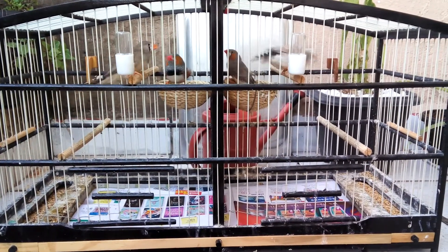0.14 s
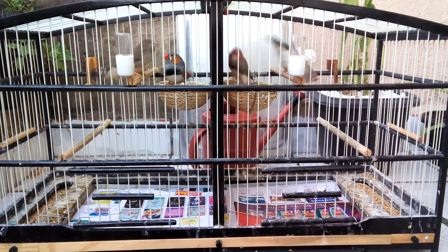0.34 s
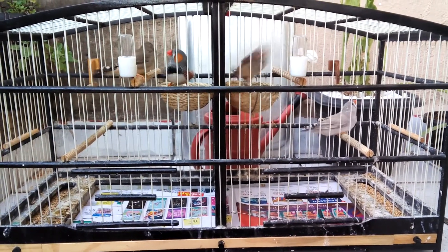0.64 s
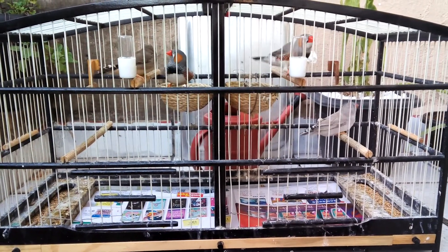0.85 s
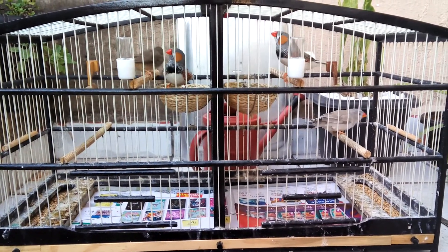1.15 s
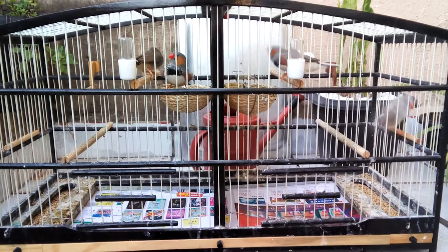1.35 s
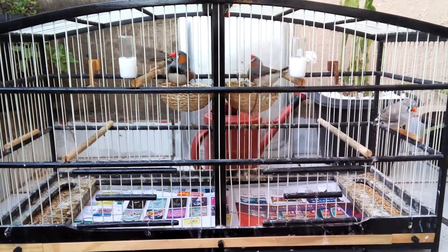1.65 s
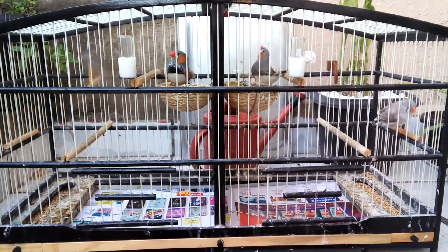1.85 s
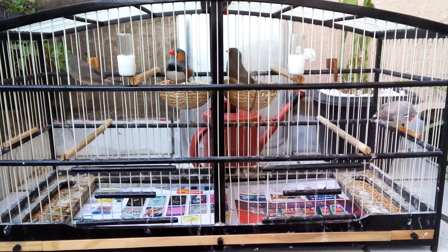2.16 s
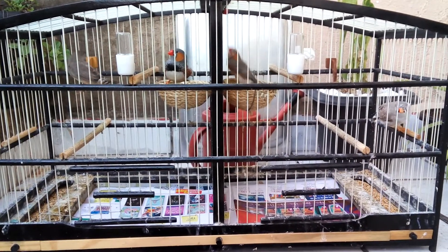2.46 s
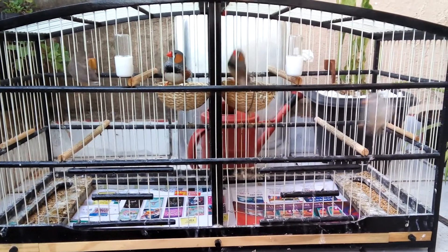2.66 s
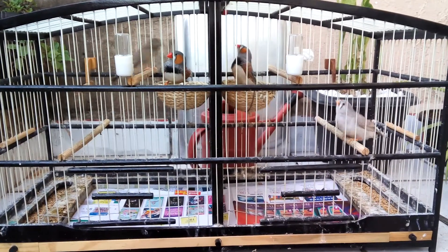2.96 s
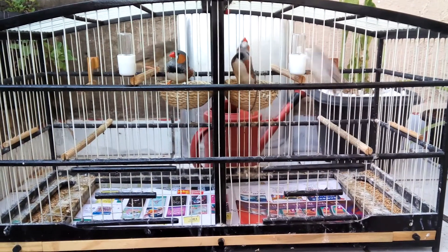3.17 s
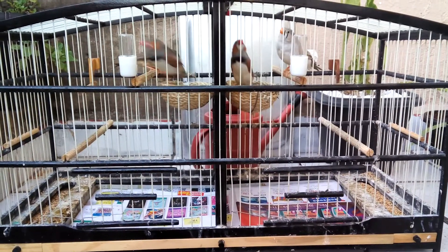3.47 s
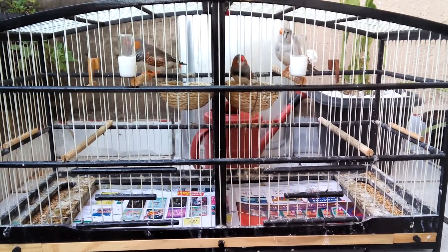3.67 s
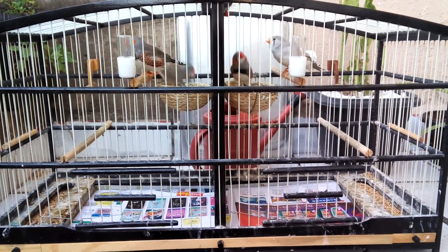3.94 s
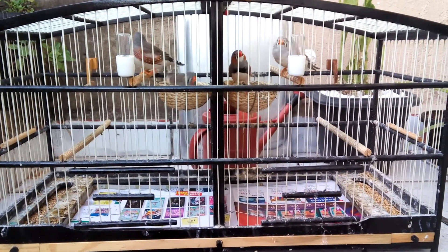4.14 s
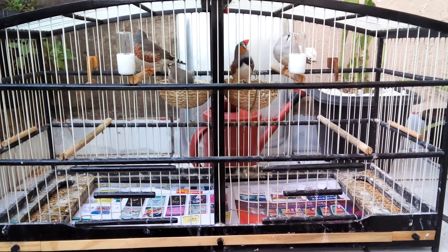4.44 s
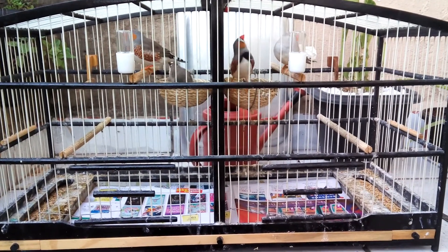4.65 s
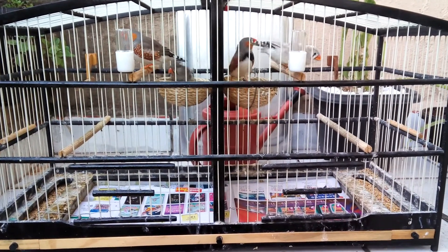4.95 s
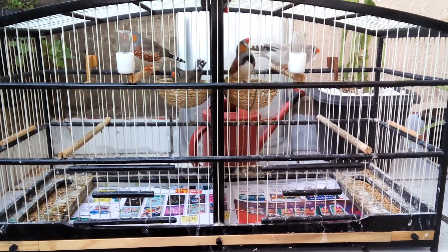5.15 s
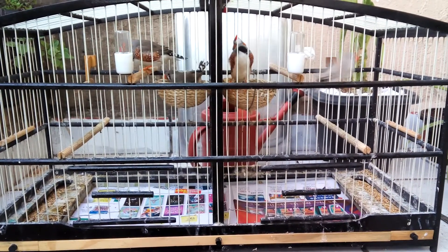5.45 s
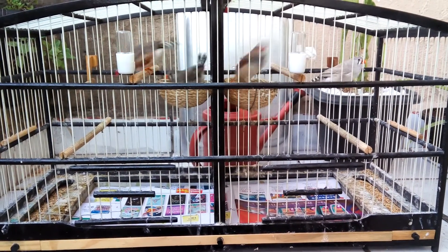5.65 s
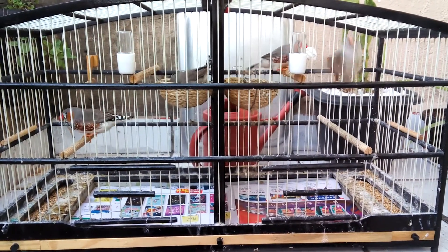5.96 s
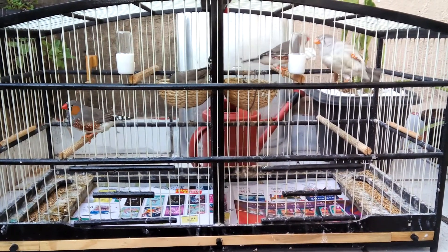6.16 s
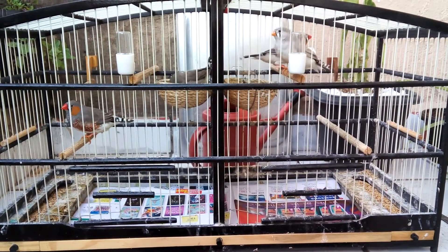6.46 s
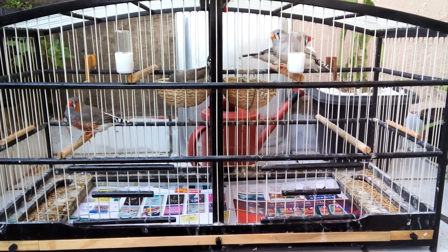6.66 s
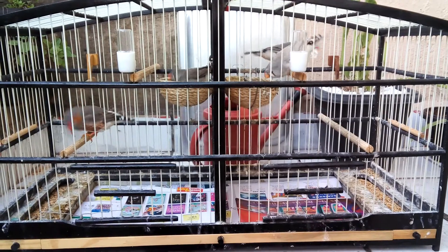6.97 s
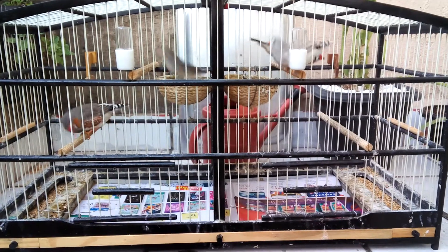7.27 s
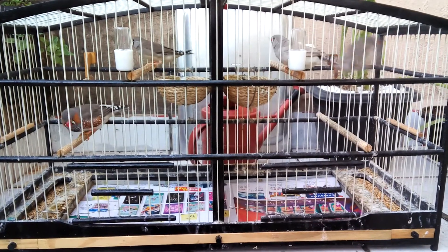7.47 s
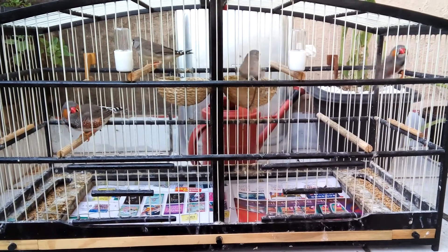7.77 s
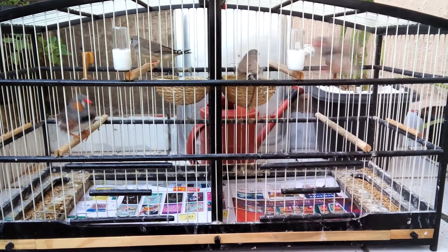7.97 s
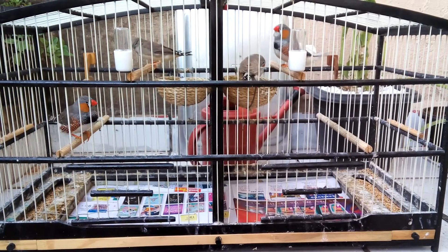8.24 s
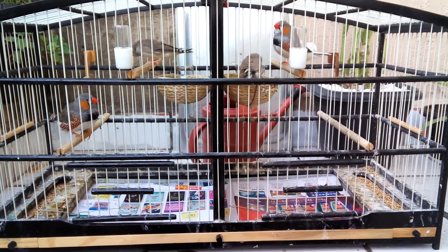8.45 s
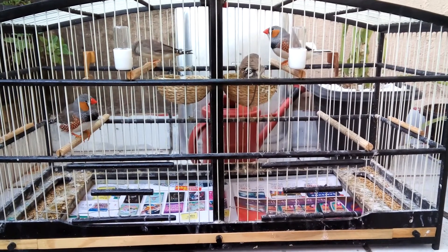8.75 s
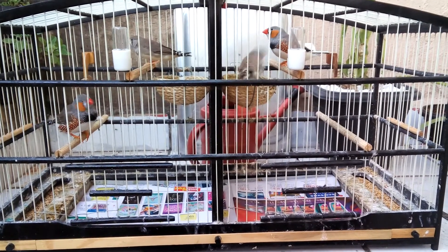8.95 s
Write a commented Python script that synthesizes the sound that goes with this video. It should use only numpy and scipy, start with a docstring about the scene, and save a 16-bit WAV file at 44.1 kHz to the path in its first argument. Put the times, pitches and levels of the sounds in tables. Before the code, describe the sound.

Zebra finches call from perches and nests: short, reedy, harmonic beeps, some soft, some loud. Claws tick lightly on wood and wire, and distant birds whistle and chirp thinly. Around the middle a dense run of nasal and scratchy notes forms a song, loudest near five seconds. Later calls are sparse, then quick soft wing beats. Quiet airy place, short reflections, softened treble.

```python
"""From the first moment caged finches trade short nasal calls in an airy room, over a low rumble and faint hiss.
Claws tick on perches and wire, and thin whistles, chirps and soft low tones come from far off as time goes on.
Rasping song notes stand out between about 3.7 and 6.2 s; near 8 s one bird flutters up.
Calls are stacks of overtones lifted by resonances, rasps are pulse trains through a resonance, and
whistles, ticks, wing beats and air are shaped noise; low tones waver, and walls add a short tail."""
import sys
import numpy as np
from scipy import signal
from scipy.fft import rfft, irfft
from scipy.io import wavfile
from scipy.ndimage import uniform_filter1d

SR = 44100
rng = np.random.default_rng(int(sys.argv[2]) if len(sys.argv) > 2 else 0)


def master_out(mix):
    """Clip the mix to full scale and print it as 16-bit PCM to the path in sys.argv[1]."""
    frames = np.transpose(np.atleast_2d(mix))
    ceiling = np.clip(frames, -1, 1)
    pcm = np.round(ceiling * 32767).astype(np.int16)
    wavfile.write(sys.argv[1], SR, pcm)


N = 401737  # samples


def gain_of(db):
    """Decibel law: 20 dB is a factor of ten in amplitude."""
    return 10 ** (np.asarray(db) / 20)


def evened(x):
    """Normalisation to a root-mean-square value of one."""
    return x / np.sqrt(np.mean(x ** 2) + 1e-20)


def read(points, hz):
    """Interpolation of a curve along a logarithmic frequency axis."""
    f, value = np.transpose(points)
    return np.interp(np.log(hz + 1), np.log(f + 1), value)


def add(mix, s, sound):
    """Superposition: a sound starting at s seconds sums into the mix."""
    part = mix[max(round(s * SR), 0):][:len(sound)]
    part += sound[:len(part)]


def wobble(count, hz):
    """Random modulation: noise smoothed twice, so that it changes about hz times a second."""
    span = max(round(SR / hz), 2)
    once = uniform_filter1d(rng.standard_normal(count), span)
    return evened(uniform_filter1d(once, span))


def coloured(count, points):
    """Spectral shaping: white noise weighted by a curve of dB against Hz."""
    hz = np.fft.rfftfreq(count, 1 / SR)
    spectrum = rfft(rng.standard_normal(count)) * gain_of(read(points, hz))
    return evened(irfft(spectrum, count))


def resonate(x, hz, width):
    """Resonance by heterodyne: shift hz down to zero, smooth, and shift back, with a gain of one."""
    turn = np.exp(2j * np.pi * np.cumsum(hz * np.ones(len(x))) / SR)
    r = np.exp(-np.pi * width / SR)
    smooth = signal.lfilter([1 - r], [1, -r], x / turn + 1e-18)  # the tiny offset avoids exact zeros
    return 2 * (turn * smooth).real


def follow(rows, rise, fall):
    """Envelope and glide: a contour read at every sample, with a soft fade at both ends."""
    s, *columns = np.transpose(rows)
    t = np.arange(max(s[0] - rise / 2, 0), s[-1] + fall, 1 / SR)
    fade_in = np.clip((t - s[0]) / rise + .5, 0, 1)
    fade_out = np.clip((s[-1] + fall - t) / fall, 0, 1)
    fade = np.sin(np.pi / 2 * fade_in * fade_out) ** 2
    return t[0], fade, [np.interp(t, s, c) for c in columns]


# Spectrum of the air and outdoor rumble. Each row: frequency in Hz, relative density in dB per Hz.
AIR_SPECTRUM = [(25, -43), (42, -22), (58, -5.5), (108, -0.5), (250, -12.5), (330, -7), (500, -15.5),
                (800, -19.5), (1500, -25), (3400, -28.5), (5500, -25.5), (7000, -26), (9000, -38.5)]
AIR_DB = -62.5  # level of the whole bed


def air():
    """Diffuse noise: random short-time spectra with drifting patches of far chatter and rumble."""
    frames, hz = N // 256 + 5, np.fft.rfftfreq(1024, 1 / SR)
    a, b, patches = rng.standard_normal((frames, 513, 3)).T
    # smoothing over 14 frequency bins and 20 frames makes the patches
    patches = evened(uniform_filter1d(uniform_filter1d(patches, 14, 0), 20, 1))
    patchy_db = read([(100, 0.4), (600, 3.4), (3000, 1.6), (6000, 2.8), (9000, .4)], hz)[:, None]
    level_db = read(AIR_SPECTRUM, hz)[:, None] + patchy_db * patches
    spectra = (a + 1j * b) * gain_of(level_db)
    return gain_of(AIR_DB) * evened(signal.istft(spectra, nperseg=1024, noverlap=768)[1][:N])


# Decay of the room. Each row: frequency in Hz, time to die by 60 dB in seconds.
ROOM_DECAY = [(500, 0.25), (3500, 0.15), (7000, 0.18), (10000, 0.044)]


def room(x):
    """Reverberation: sparse echoes of random sign, each band dying at its own speed."""
    taps = np.zeros(SR // 2)
    at = np.arange(60, len(taps) - 20, 20)
    taps[at + rng.integers(0, 20, len(at))] = rng.choice([-1., 1.], len(at))
    hz, t, spectra = signal.stft(taps, SR, nperseg=256)
    decay = gain_of(-60 * t / read(ROOM_DECAY, hz)[:, None])
    tail = signal.istft(spectra * decay, SR, nperseg=256)[1]
    return signal.fftconvolve(x, tail / np.linalg.norm(tail))[:N]


# Short low tones from far off: hoots, and near 4.6-4.8 s a faint finch call.
# Each row: start in seconds, length in seconds, level in dB, mean pitch in Hz.
LOW_TONES = [(3.952, 0.1, -63.5, 370), (4.31, 0.03, -60, 480), (4.41, .065, -62, 330), (4.47, .2, -56, 497),
             (4.575, .05, -62, 610), (4.655, .08, -63, 335), (4.71, .11, -64, 605),
             (5.572, 0.098, -62, 757), (7.877, 0.085, -60.5, 346)]


def low_tone(s, length, db, hz):
    """Frequency modulation: a soft low tone that wavers slightly in pitch and level."""
    count = round(length * SR)
    pitch_hz = hz * (1 + 0.026 * wobble(count, hz=60.))
    tone = np.sin(2 * np.pi * np.cumsum(pitch_hz) / SR)
    level_db = db + 2.9 * wobble(count, hz=30.14)
    return s, gain_of(level_db) * tone * signal.windows.tukey(count, .5)


# Thin whistles of far birds, and at 7.18 s the faint ring of a ticked wire.
# Each row: start in seconds, length in seconds, level at the start in dB, start pitch in Hz, end pitch in Hz.
THIN_LINES = [(.83, .17, -59, 5920, 6160), (1.575, .085, -63, 6540, 6250), (2.14, .08, -66.5, 5830, 5800),
              (2.64, .05, -60, 6160, 6140), (4.765, .045, -64, 5600, 5440), (7.18, .1, -69, 3900, 4000),
              (7.71, .28, -61, 6250, 6040)]
LINE_FADE_DB = -6.5  # change of level from start to end


def gliding(s, length, db, start_hz, end_hz):
    """Linear glide: pitch and level run straight from start to end."""
    return [(s, db, start_hz), (s + length, db + LINE_FADE_DB, end_hz)]


def thin_line(rows):
    """Narrow-band noise: a thin tone smeared into a fuzzy line, with a width set by its pitch."""
    s, fade, (db, hz) = follow(rows, rise=.025, fall=.025)
    width = 0.1 * hz.mean()
    noise = rng.standard_normal(len(hz))
    line = resonate(resonate(noise, hz, width), hz, width)
    level_db = db + 2.5 * wobble(len(hz), hz=60.)
    return s, gain_of(level_db) * fade * evened(line)


# Arched chirps of far birds.
# Each row: start in seconds, length in seconds, level at the top in dB, start pitch in Hz, top pitch in Hz.
CHIRPS = [(2.558, .095, -55.5, 3700, 4200), (3.805, .09, -53, 3500, 4470), (4.78, .1, -42.5, 3100, 4560)]
CHIRP_START_DB, CHIRP_END_DB = -15, -8  # relative to the level at the top
CHIRP_TOP, CHIRP_END = .5, .81  # shares of the length and of the top pitch


def arched(s, length, db, start_hz, top_hz):
    """Curved glide: pitch and level round over one arch, to be voiced as a thin line."""
    u = np.linspace(0, 1, num=20)
    before = np.clip(1 - u / CHIRP_TOP, 0, 1)
    after = np.clip((u - CHIRP_TOP) / (1 - CHIRP_TOP), 0, 1)
    rise_hz = (top_hz - start_hz) * before ** 1.7
    drop_hz = top_hz * (1 - CHIRP_END) * after ** 1.3
    level_db = db + CHIRP_START_DB * before + CHIRP_END_DB * after
    return np.transpose([s + u * length, level_db, top_hz - rise_hz - drop_hz])


# Claws and beaks on perch and wire. Each row: start in seconds, direct peak in dB, ring in Hz.
TICKS = [(0.0917, -28.5, 5240), (0.8543, -46, 5850), (1.4494, -37, 6670), (1.7145, -43.5, 4310),
         (1.7304, -41, 5670), (1.9998, -46.5, 4820), (2.2464, -44.5, 5360), (2.259, -42.5, 6710),
         (2.475, -47.5, 4010), (2.7102, -46.5, 5070), (5.815, -44, 5600), (6.011, -46, 6100),
         (6.158, -40, 5400), (6.2014, -41, 5380), (6.3719, -45, 5380), (6.4135, -46.5, 6050),
         (7.1664, -44.5, 4000), (7.224, -47.5, 3980), (7.585, -41, 5860), (7.868, -42, 5660)]


def tick(s, db, hz):
    """Impact excitation: a tiny crack of noise rings thin wire for a moment."""
    t = np.arange(900) / SR
    crack = rng.standard_normal(len(t)) * gain_of(-60 * t / 0.022)
    sound = resonate(crack, hz, 1200) + 0.13 * crack
    return s, gain_of(db) * sound / abs(sound).max()


# Wing beats of the bird that flies up; each sound begins 2 ms ahead of its row.
# Each row: time in seconds, strength in dB.
WING_BEATS = [(7.993, -43), (8.0169, -37.5), (8.0356, -36), (8.065, -32.5), (8.102, -31), (8.13, -52),
              (8.1712, -48)]
# Spectrum of the feathers' swish. Each row: frequency in Hz, relative density in dB per Hz.
FEATHERS = [(300, -26), (950, -8), (2500, -5), (6000, 7.5), (8000, 4.5), (15000, -10)]
PUSH_DB = -18  # the low push of air, below the strength of the stroke


def wing_beat(s, db):
    """Flow noise: feathers swish, and the stroke pushes a low puff of air."""
    t = np.arange(4000) / SR
    snap = min(gain_of(db + 28), 1)  # only hard strokes slap
    onset = 1 - np.exp(-t / 0.0026)
    decay = snap * np.exp(-t / 0.0043) + 0.29 * np.exp(-t / 0.019)
    swish = coloured(len(t), FEATHERS) * onset * decay
    puff = (t / 0.014) * np.exp(1 - t / 0.011)
    push = coloured(len(t), [(40, -20.5), (250, 0.5), (700, -18), (2000, -33)]) * puff
    return s - .002, gain_of(db) * swish + gain_of(db + PUSH_DB) * push


# Rasping song notes, and at 5.58 s the faint tail that the room leaves after one.
# Each row: start in seconds, length in seconds, level in dB, resonance centre in Hz, resonance width in Hz.
RASPS = [(3.685, 0.062, -42.5, 5500, 2600), (3.69, .06, -47, 2800, 2400), (3.858, 0.053, -43.5, 4300, 2200),
         (3.967, .075, -39.5, 4600, 2000), (3.87, .06, -57, 1400, 1300), (3.96, .09, -52, 1400, 1300),
         (4.12, .07, -49, 3200, 2600), (5.144, 0.068, -36, 4430, 1600), (5.284, 0.051, -36.5, 5000, 1600),
         (5.387, .055, -38, 5145, 1600), (5.53, .06, -44, 4350, 1500), (5.579, .14, -60, 4400, 1500),
         (6.15, 0.066, -55, 5640, 1600), (1.697, 0.076, -63, 6000, 1600), (2.643, .1, -62, 4370, 1510)]


def rasp(s, length, db, hz, width):
    """Pulse excitation: pulses of unsteady, sinking rate and uneven strength tear the overtones apart."""
    count = round(length * SR)
    rate_hz = 640 * np.linspace(1.05, .93, count) * (1 + .05 * wobble(count, hz=253.0))
    pulses = np.diff(np.floor(np.cumsum(rate_hz) / SR), prepend=0)
    pulses = pulses * (1 + .7 * rng.standard_normal(count))
    drive = evened(pulses) + .38 * rng.standard_normal(count)
    wide = resonate(drive, hz, width)
    voiced = resonate(wide, hz, width) + .08 * wide
    level_db = db + 3.1 * wobble(count, hz=90.)
    return s, gain_of(level_db) * evened(voiced) * signal.windows.tukey(count, .6)


# How each kind of call is sung. Each holds: low hold in seconds, scoop in seconds, scoop depth as share of
# pitch, bend of the arch as share of pitch, top of the arch as share of length, final drop in seconds,
# drop depth as share of pitch, onset level in dB, end level in dB.
SHORT_SHAPE = (.019, .026, .024, .008, .99, .016, .09, .3, -4)
LONG_SHAPE = (.006, .03, .096, .14, .5, .022, .012, -3, -5)
ARCHED_SHAPE = (.018, .036, .021, .017, .99, .04, .07, -1.5, -3)
HIGH_SHAPE = (.005, .01, .05, .018, .01, .025, .044, -.5, -5)
LATE_SHAPE = (.013, .022, .1, .09, .42, .02, .03, -2.5, -5)
FALLING_SHAPE = (0, .01, .009, .08, .01, .008, .01, 1.5, -3)


def sung(s, length, db, swell_db, hz, shape):
    """Pitch contour: a scoop up, a low arch and a final drop, while effort swells or fades evenly."""
    hold, scoop, depth, bend, top, drop, fall, onset_db, end_db = shape
    u = np.linspace(0, 1, num=40)
    early = np.sin(np.pi / 2 * np.clip(1 - (u * length - hold) / scoop, 0, 1)) ** 2
    late = np.clip(1 - (1 - u) * length / drop, 0, 1)
    pitch_hz = hz * (1 - depth * early - bend * (u - top) ** 2 - fall * late)
    effort_db = db + swell_db * u + onset_db * early + end_db * late
    return np.transpose([s + u * length, effort_db, pitch_hz])


# What every call shares from syrinx and windpipe. Each row: frequency in Hz, relative level in dB.
WINDPIPE = [(400, -45), (600, -27.5), (1170, -10.5), (1750, -12.5), (2350, -4.5), (3000, -1.5), (4500, 3),
            (5800, -3.5), (7000, -9.5), (8200, -9), (9200, -19), (10500, -7), (12500, -30)]


def call(rows, posture, held_rough):
    """Source and filter: overtones with a weak fundamental, lifted by throat and beak resonances."""
    throat_hz, beak_hz, beak_db, low_db = posture
    s, fade, (effort_db, hz) = follow(rows, rise=.019, fall=.01)
    # low air pressure at both ends: the membranes flap unevenly, and the pitch sags as the call dies
    slack = 1 - fade
    sag = 1 - .2 * slack * np.linspace(0, 1, len(hz))
    hz = uniform_filter1d(hz, 300, mode="nearest") * sag
    rough = np.clip(held_rough + .9 * uniform_filter1d(slack, 700, mode="nearest"), 0, .95)
    jitter = 1 + .06 * rough * wobble(len(hz), hz=307.0)
    turns = np.cumsum(hz * jitter) / SR

    k = np.arange(1, 22)[:, None]  # overtone numbers
    partial_hz = k * hz
    throat = 1 / (1 + ((partial_hz - throat_hz) / 400) ** 2)
    beak = gain_of(beak_db) / (1 + ((partial_hz - beak_hz) / 330) ** 2)
    low = gain_of(low_db / (1 + (partial_hz / 2200) ** 6))
    size = gain_of(read(WINDPIPE, partial_hz)) * low * (0.13 + throat + beak)
    # each overtone swells and fades irregularly, those away from the throat resonance most
    swells = np.array([wobble(len(hz), hz=40.) for _ in k])
    size *= gain_of(2.8 * (1.34 - throat) * swells)
    size /= np.sqrt((size ** 2).sum(0) / 2)
    lag = .5 * rng.standard_normal(k.shape)
    stack = (size * np.cos(2 * np.pi * k * turns + lag)).sum(0)

    breath = evened(resonate(coloured(len(hz), WINDPIPE), throat_hz, 3600))
    voice = np.sqrt(1 - rough ** 2) * stack + rough * breath
    return s, gain_of(effort_db) * fade * voice


# Nasal calls, one table a kind. Each row: start in seconds, length in seconds, effort in dB, swell over
# the call in dB, pitch before scoop, arch and drop in Hz, throat resonance in Hz, beak resonance in Hz,
# beak level in dB, boost of the low overtones in dB.
SHORT_CALLS = [ (.005, .04, -52, -8, 578, 3360, 5700, 7, 9),
               (.092, .072, -41.5, -2, 600, 3530, 9400, -2.5, 17),
               (.965, .072, -58, 2, 500, 5130, 3000, -10, 17),
               (1.19, .06, -55, -10, 607, 2350, 3870, -8, 11),
               (1.67, .06, -54, -8, 622, 6030, 4900, -15.5, 9),
               (3.302, .066, -42, 0, 603, 4310, 2690, -7, 11),
               (3.566, .064, -41, -2, 608, 3900, 5750, -14, 20),
               (3.87, .061, -42.5, -1, 603, 4560, 3260, -2, 18),
               (4.178, .066, -40.5, -4, 612, 3400, 5000, -3, 18),
               (4.28, .07, -51, -3, 600, 4120, 2100, -6.5, 12.5),
               (6.722, .066, -43.5, 0, 599, 3650, 5600, 1, 21),
               (7.338, .078, -56.5, 6, 559, 5240, 3400, 4, 24),
               (7.63, .061, -39.5, -4.5, 603, 3670, 5100, -1, 19)]
LONG_CALLS = [ (.46, .111, -29, 1, 585, 4230, 2950, 2, 3),
              (3.948, .172, -28.5, 2.5, 602, 4300, 3300, 3, 5.5),
              (4.365, .154, -28, 4, 591, 2950, 4050, 7, 5.5),
              (4.888, .196, -23.5, 0, 589, 4040, 3220, 0, -1),
              (5.305, .13, -26.3, -1.5, 583, 4030, 2930, 4, 1.5)]
ARCHED_CALLS = [ (.386, .074, -36.5, 0, 605, 3100, 2700, 4, 19),
                (1.046, .09, -44, 2, 606, 2140, 3500, -3, 5), (1.378, .068, -39, 1, 604, 2250, 3140, 4, 7),
                (4.128, .042, -34.5, -4, 608, 2890, 4320, -12, 16),
                (5.782, .068, -44.5, 4.5, 586, 3530, 2500, 6, 14),
                (6.122, .072, -39.5, 0, 597, 2840, 3660, -20, 10.5)]
HIGH_CALLS = [(.64, .1, -24.7, -.5, 667, 3375, 4400, 4, 8.5)]
LATE_CALLS = [(2.842, .075, -30, -2, 571, 2950, 4140, 6, 11),
              (5.871, .103, -31, -2.5, 566, 2820, 4000, 1, 1),
              (7.419, .113, -33.3, .3, 570, 2680, 3880, 2, 4)]
FALLING_CALLS = [(5.213, .087, -28.5, -3.5, 728, 5100, 3650, -6, 0),
                 (5.444, .1, -33, -4, 698, 5150, 3900, -6, 7)]
CLEAR, HOARSE = .045, .11  # roughness of the held part, which sets breath and jitter


def add_calls(cage, walls):
    """Direct and reflected sound: every call goes straight to the ear and also feeds the walls."""
    for table, shape, held_rough in ((SHORT_CALLS, SHORT_SHAPE, CLEAR), (LONG_CALLS, LONG_SHAPE, CLEAR),
                                     (ARCHED_CALLS, ARCHED_SHAPE, CLEAR), (HIGH_CALLS, HIGH_SHAPE, CLEAR),
                                     (LATE_CALLS, LATE_SHAPE, CLEAR),
                                     (FALLING_CALLS, FALLING_SHAPE, HOARSE)):
        for s, length, db, swell_db, hz, *posture in table:
            s, sound = call(sung(s, length, db, swell_db, hz, shape), posture, held_rough)
            add(cage, s, sound)
            # a quieter bird sits farther off or faces away, so more of it comes by the walls
            add(walls, s, sound * gain_of(-.2 * (db + 21)))


def scene():
    """Superposition of the air, the far sounds, the cage and its reverberation."""
    cage, walls, far = np.zeros(N), np.zeros(N), np.zeros(N)
    for row in LOW_TONES:
        add(far, *low_tone(*row))
    for row in THIN_LINES:
        add(far, *thin_line(gliding(*row)))
    for row in CHIRPS:
        add(far, *thin_line(arched(*row)))
    for source, table in ((tick, TICKS), (wing_beat, WING_BEATS), (rasp, RASPS)):
        for row in table:
            s, sound = source(*row)
            add(cage, s, sound)
            add(walls, s, 1.8 * sound)
    add_calls(cage, walls)
    return (cage + gain_of(-10.5) * room(walls) + far + air())[None]


# Response of the microphone. Each row: frequency in Hz, gain in dB.
MICROPHONE = [(6300, 0.5), (7300, -7), (8000, -18), (10000, -22), (15000, -36.5)]
# Self-noise of the input. Each row: frequency in Hz, relative density in dB per Hz.
HISS_SPECTRUM = [(3000, 1), (9000, -1), (15000, -2.5)]
HISS_DB = -79.5  # level before the band limit
EDGE_HZ = 15720  # band limit


def record(dry):
    """Linear filtering: the microphone dulls the treble, the input adds its hiss, then the band limit."""
    hz = np.linspace(0, SR / 2, 257)
    response = signal.firwin2(255, hz, gain_of(read(MICROPHONE, hz)), fs=SR)
    heard = signal.oaconvolve(dry, response[None], "same")
    heard = heard + gain_of(HISS_DB) * coloured(N, HISS_SPECTRUM)
    band_limit = signal.firwin(511, EDGE_HZ, window=("kaiser", 9), fs=SR)
    return signal.oaconvolve(heard, band_limit[None], "same")


dry = scene()
out = record(dry)
master_out(out)
```